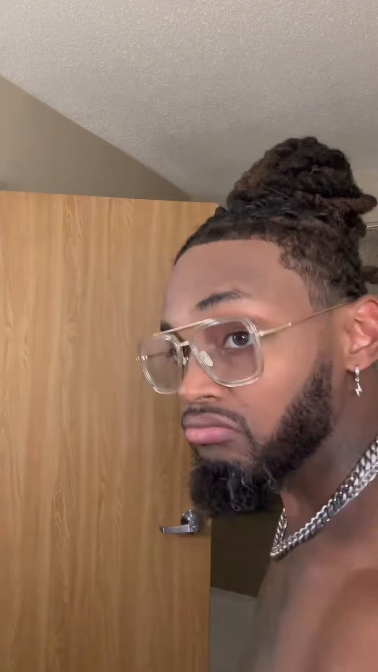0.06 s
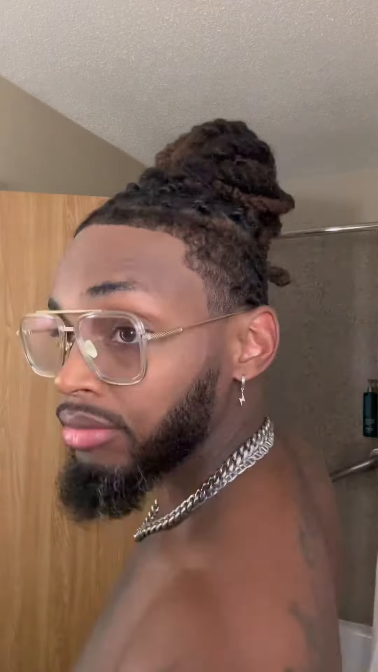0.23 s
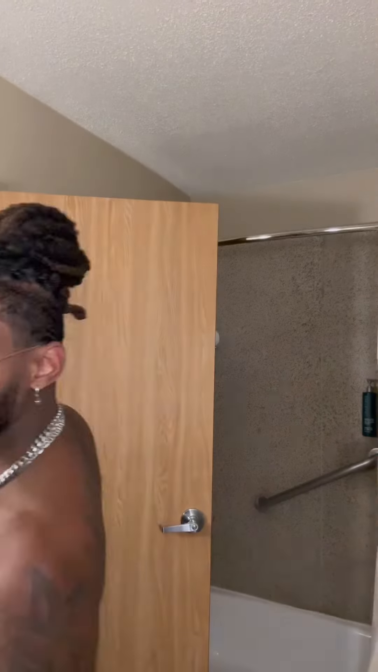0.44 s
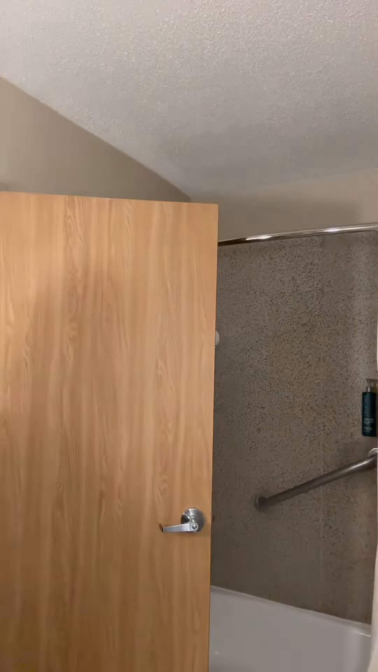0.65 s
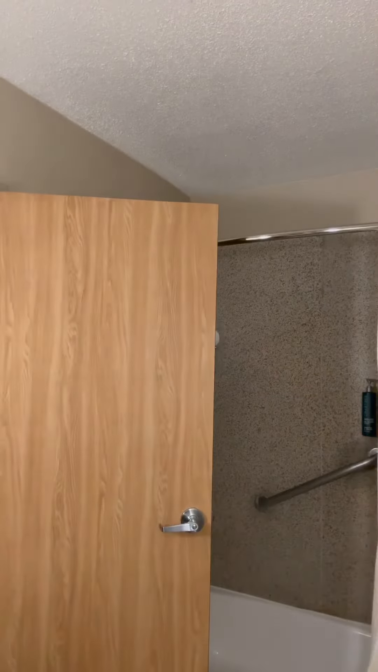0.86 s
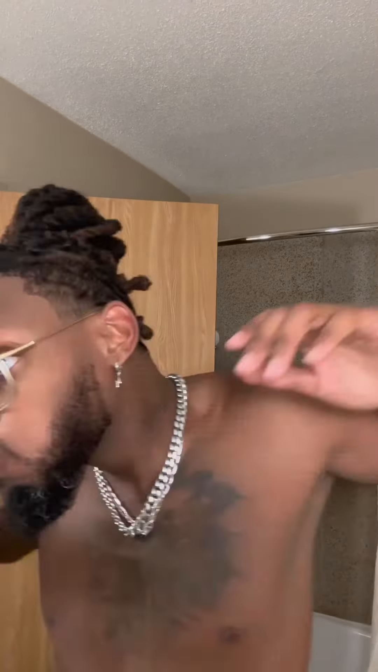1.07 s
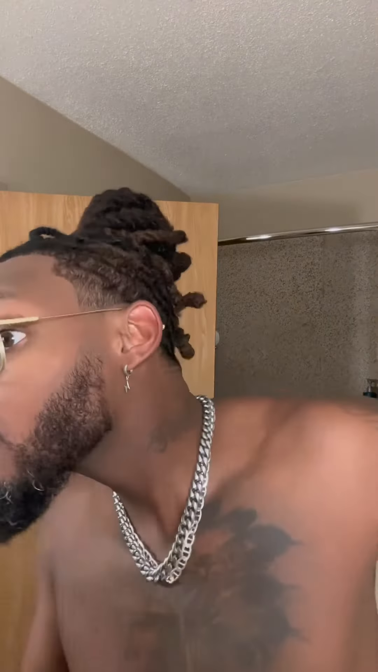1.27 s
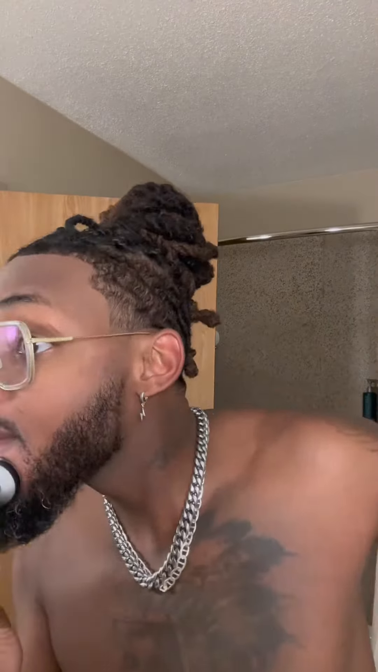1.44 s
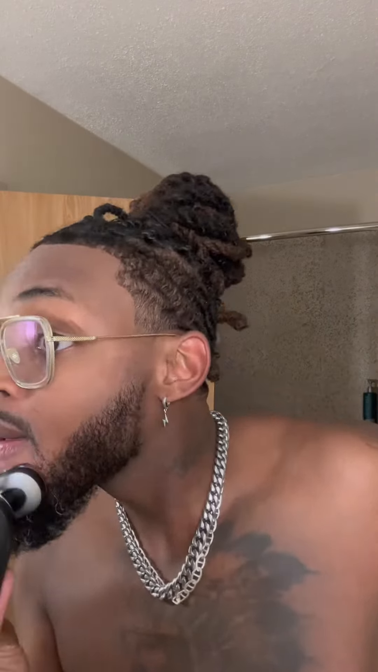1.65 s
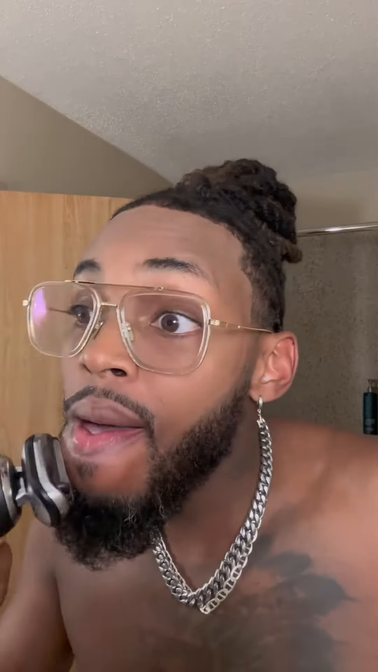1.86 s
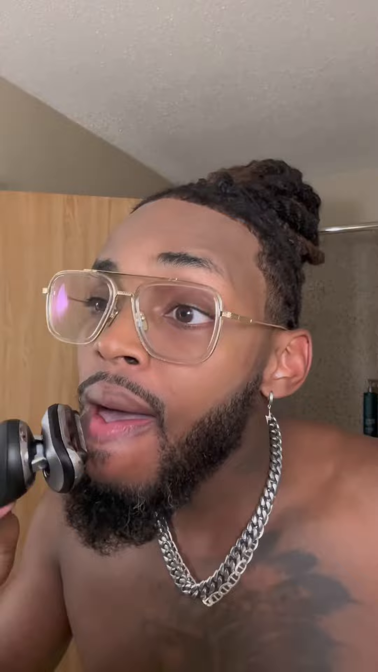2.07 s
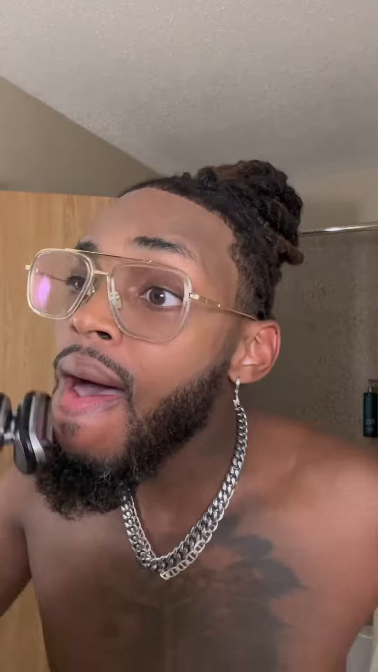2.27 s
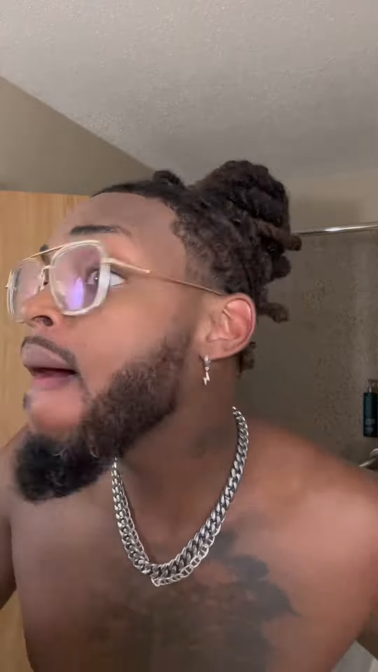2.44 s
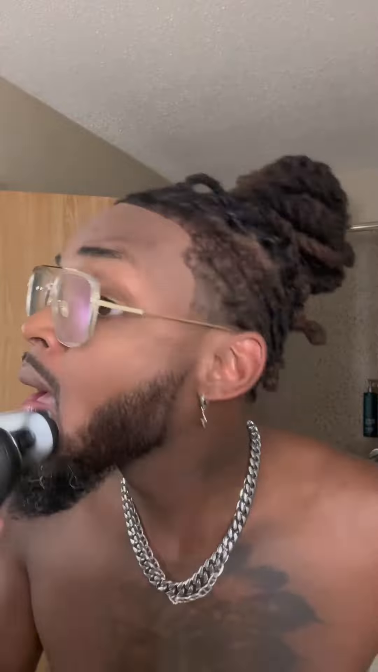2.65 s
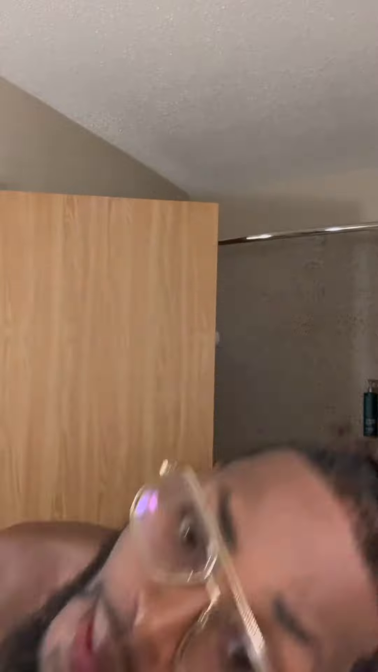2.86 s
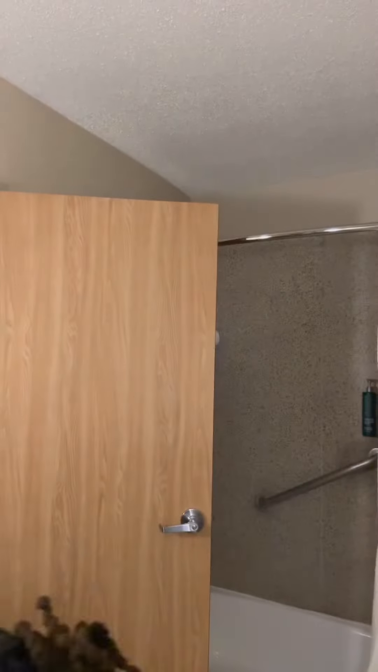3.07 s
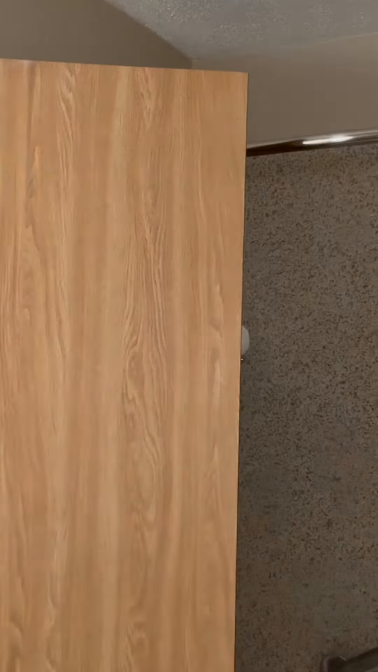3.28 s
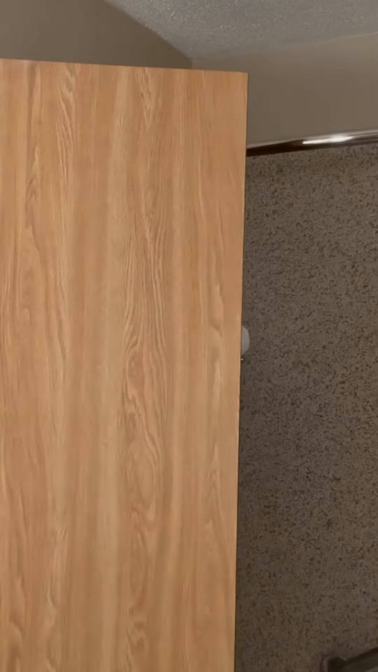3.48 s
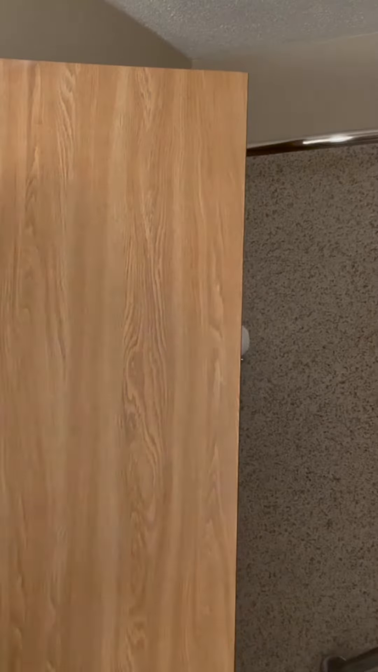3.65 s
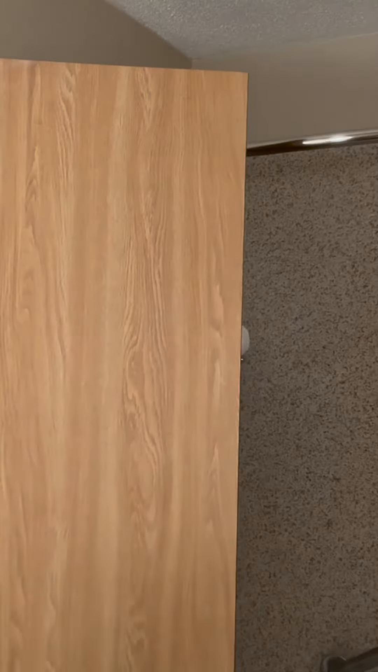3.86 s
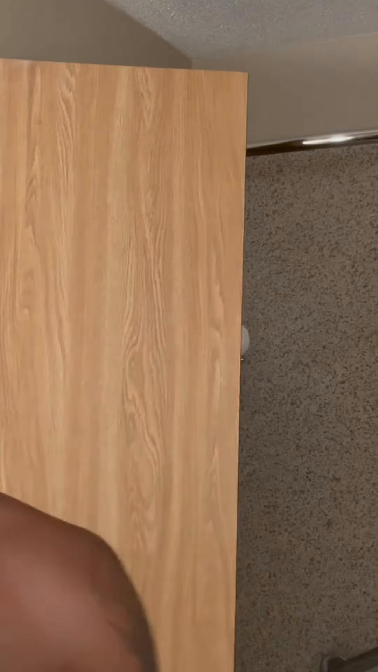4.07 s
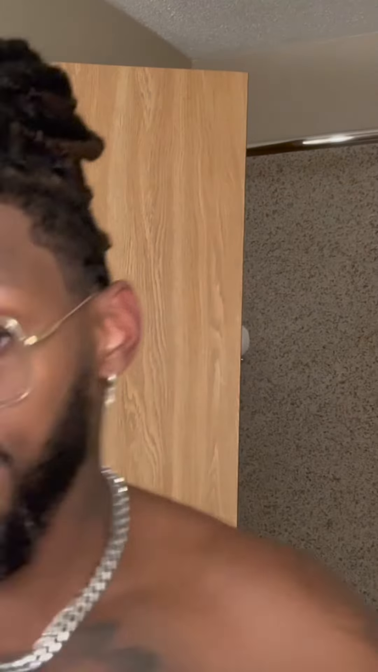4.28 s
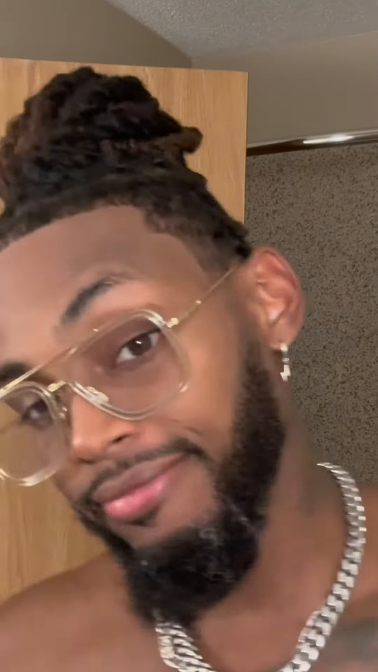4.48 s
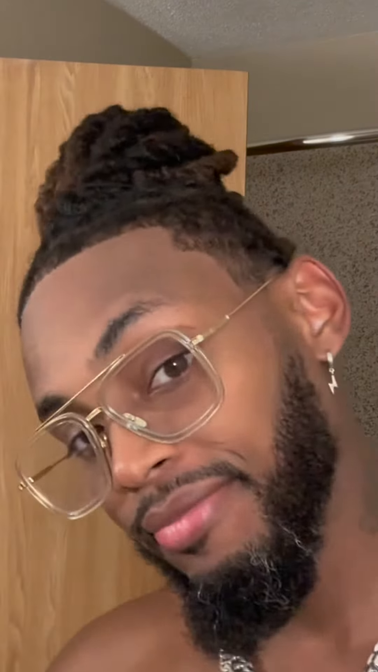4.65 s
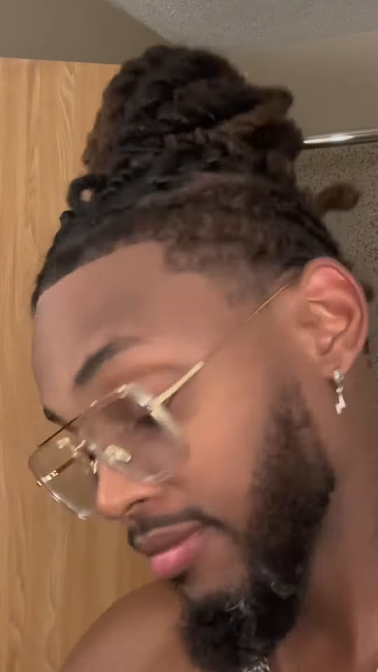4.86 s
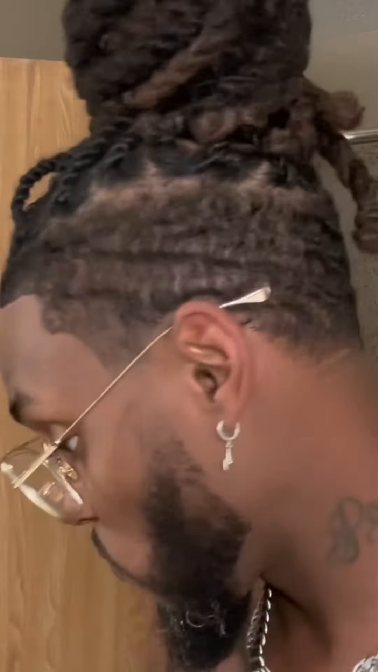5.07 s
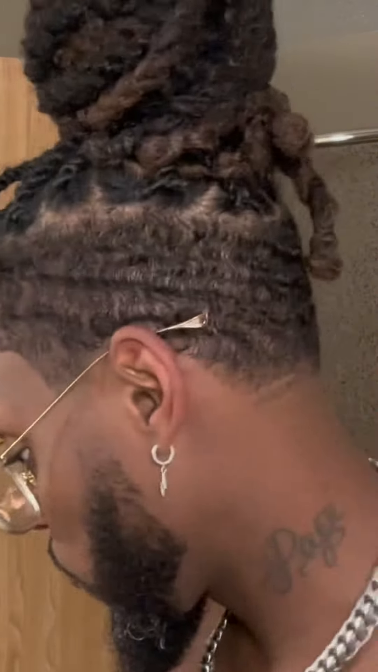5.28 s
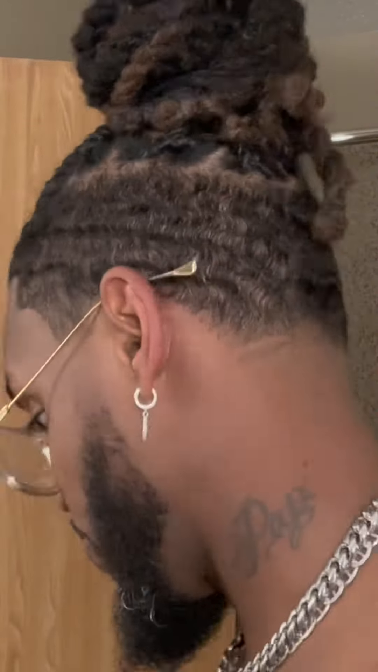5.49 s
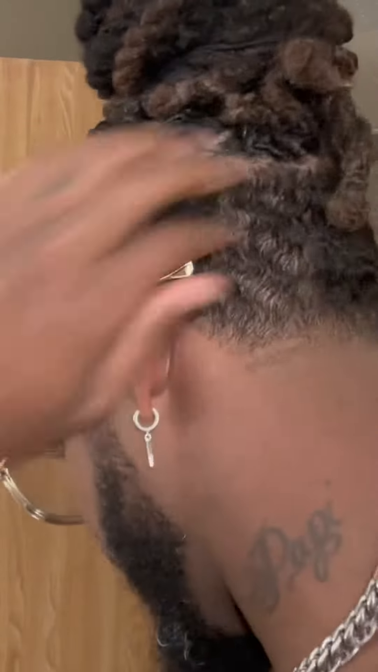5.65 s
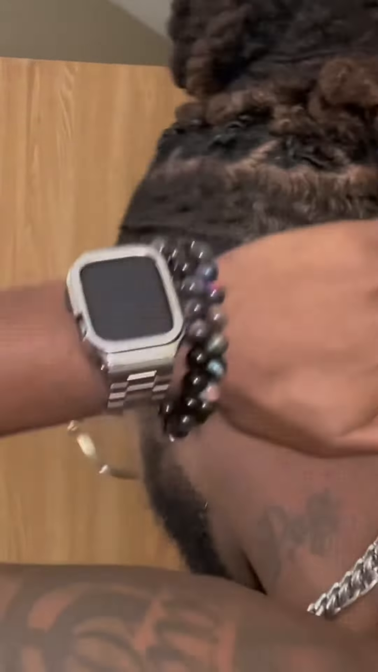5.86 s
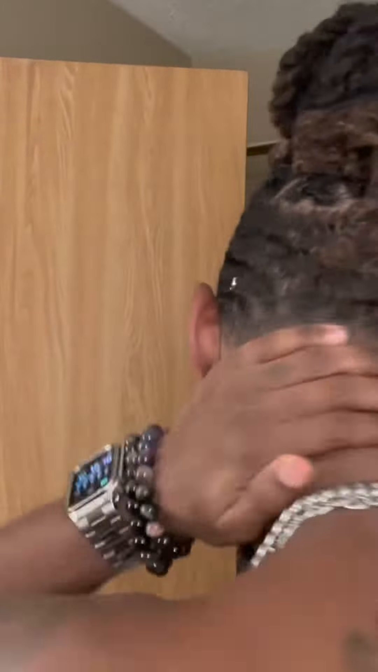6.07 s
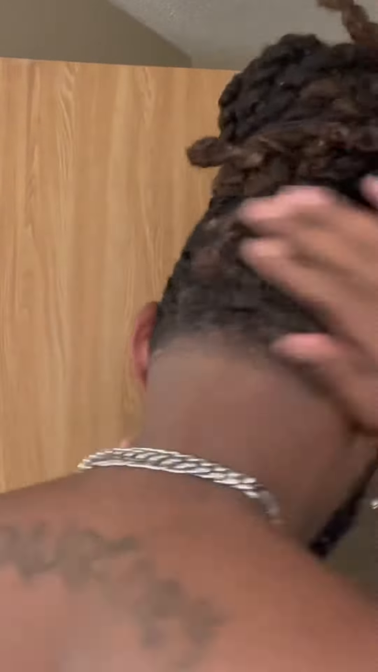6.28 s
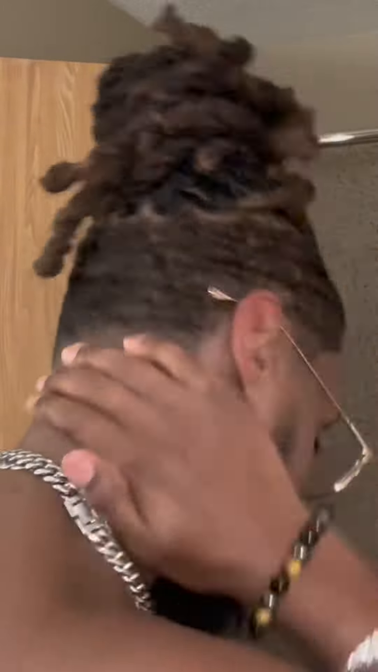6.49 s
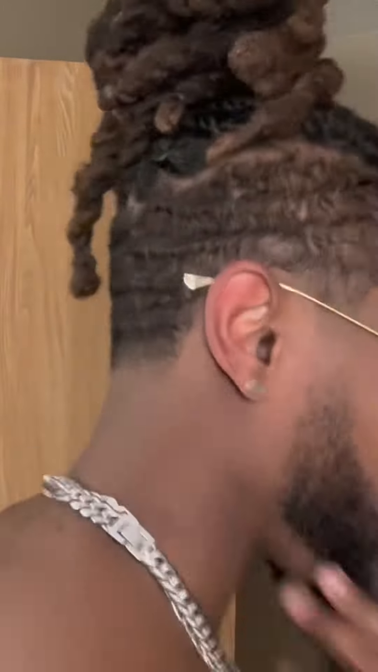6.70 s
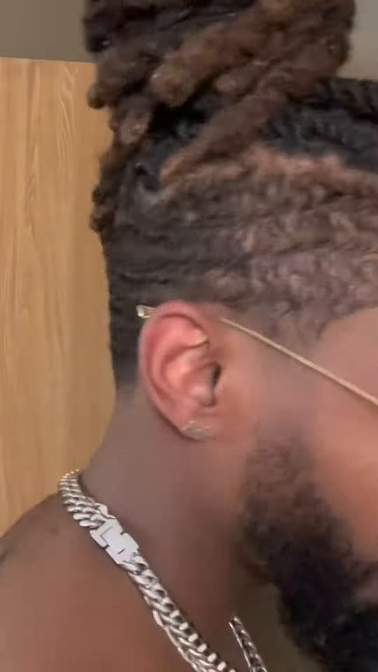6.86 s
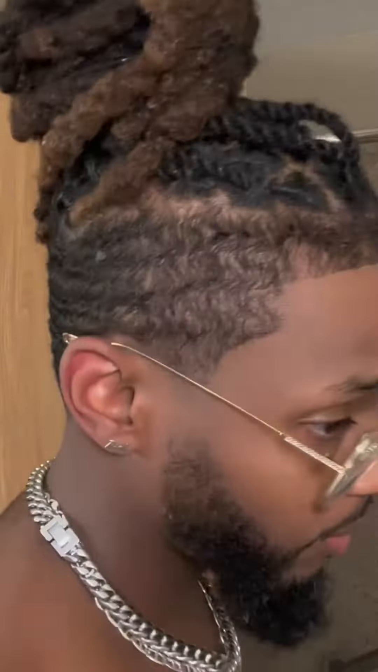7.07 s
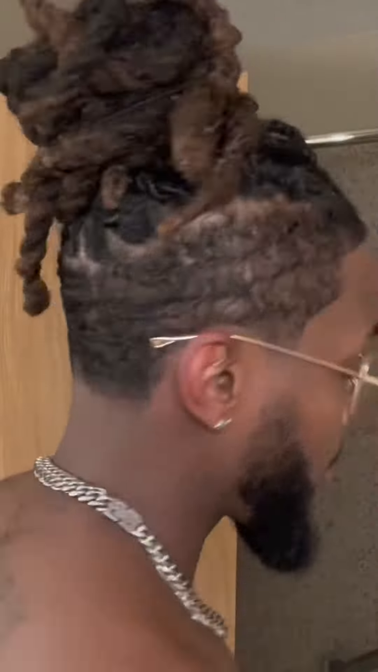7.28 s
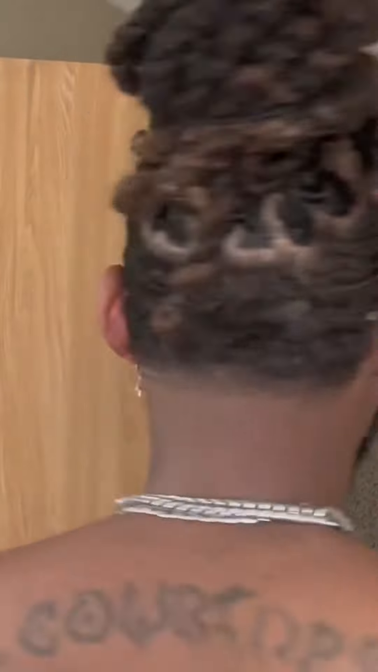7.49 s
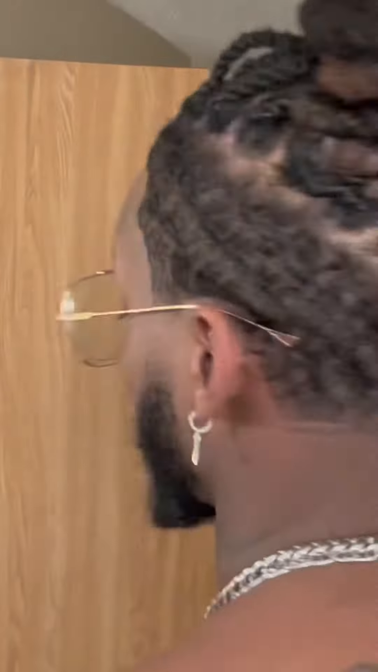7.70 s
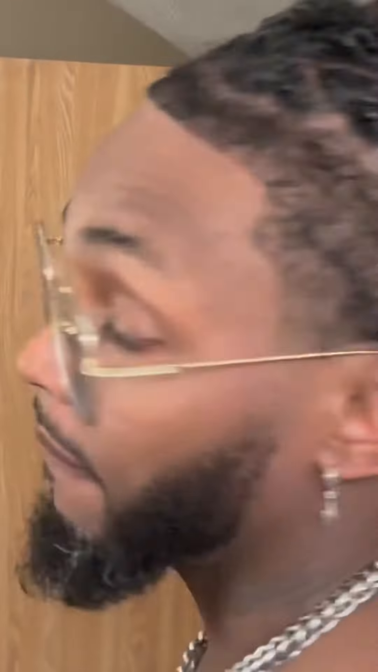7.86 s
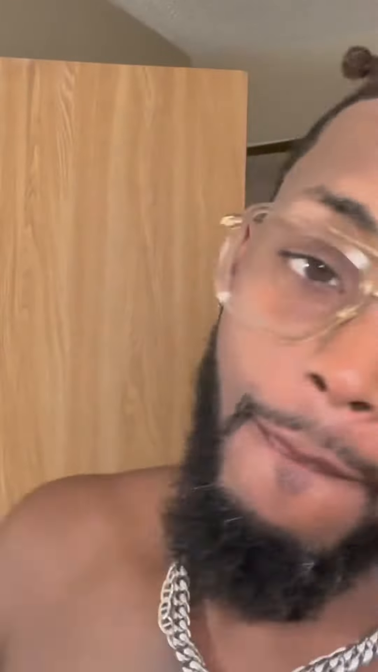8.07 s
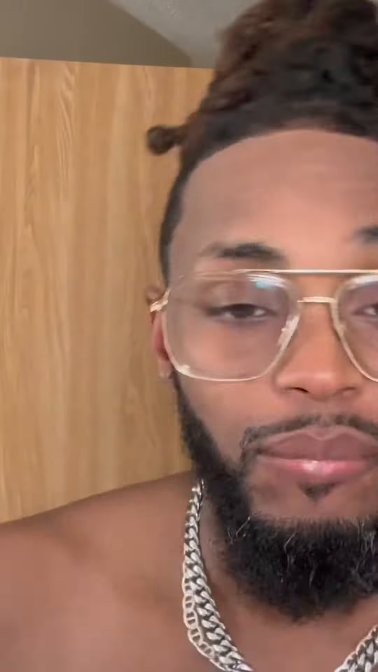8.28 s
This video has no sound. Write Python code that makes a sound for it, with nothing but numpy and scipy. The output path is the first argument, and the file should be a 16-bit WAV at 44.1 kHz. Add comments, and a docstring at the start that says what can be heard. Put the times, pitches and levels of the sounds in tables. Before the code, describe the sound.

A small bathroom, heard closely in stereo, with a soft low ventilation rumble throughout. From 0 to 0.85 s its hum throbs quickly, with small dull ticks and faint rubs; it then steadies, and a brushing rustle rises around 1 s. At 1.13 s an electric hair trimmer spins up rapidly and dominates: a raspy buzz near 148 Hz with strong upper overtones, fine blade hiss and patchy hair crunch, its tone shifting as grip and load change, with a bright swell near 2.8 s. It stops sharply at 3.3 s. The low hum stays, with barely audible thin tones from 3.7 to 5.25 s. Short, dry rubs of skin and hair come irregularly, stronger around 5.3, 6 and 6.7 s, among crisp jewellery clicks at 3.5, 3.8, 5.5 and 5.75 s, the sharpest at 6.77 s. After 7.2 s only light rubs and hum remain.

```python
"""A small bathroom: a ventilation fan, a rustling mover and two seconds of electric trimmer.
First the fan's hum throbs over its rumble, built from sines and coloured noise, with soft rubs and ticks.
From 1.13 to 3.3 s the trimmer runs close by: harmonics of its shaft speed, blade hiss and hair crunch.
Then skin and hair rustle in grainy noise strokes, and jewellery ticks as short rings and knocks, to the end.
The fan stays underneath throughout, joined by faint tones from 3.7 to 5.25 s."""
import sys
import numpy as np
from scipy import signal
from scipy.fft import rfft, irfft, next_fast_len
from scipy.io import wavfile
from scipy.ndimage import uniform_filter1d, map_coordinates

SR = 44100
rng = np.random.default_rng(int(sys.argv[2]) if len(sys.argv) > 2 else 0)


def materialize(psi):
    """Save the field psi as 16-bit PCM at rate SR to the path in sys.argv[1].

    A 1-D psi becomes a single channel; in a 2-D psi each row is a channel.
    """
    bounded = np.clip(np.atleast_2d(psi).T, -1, 1)
    quanta = np.round(bounded * 32767).astype(np.int16)
    wavfile.write(sys.argv[1], SR, quanta)


N = 367339
T = np.arange(N) / SR  # time, s

# three stretches of the fan sound, each with its own hum pitch: start_s, pitch_hz, hum_level_db, throb_depth
# (0-1), draught_level_db
FAN_STAGES = [(0, 114.3, -54, 0.8, -81), (0.851, 128, -51.5, 0, -76), (3.269, 120.3, -45.5, 0.13, -78.5)]
# faint tones that come and go: pitch_hz, level_db; then the span in which they sound: start_s, end_s
FAINT_TONES = [(1050, -85.5), (1990, -88.5), (4720, -99)]
FAINT_TONES_SPAN = (3.7, 5.25)
# colour of the fan's air and motor rumble: freq_hz, density_db (relative, per Hz)
RUMBLE_COLOUR = [(25, -15.5), (45, -7), (66, 6.5), (90, -5.5), (125, -5.5), (160, -14), (200, -7),
                 (260, -21), (320, -17), (450, -40), (700, -41.5), (1200, -45.5), (2000, -51.5),
                 (4000, -54.5), (8000, -64), (15000, -78)]
# loudness curve of that rumble: time_s, level_db
RUMBLE_CURVE = [(0, -56), (.6, -55), (1.2, -52.5), (3.3, -51.5), (5, -52), (8.33, -52.5)]
# colour of the draught through the grille: freq_hz, density_db (relative, per Hz)
DRAUGHT_COLOUR = [(250, -19), (400, 3), (650, 0.5), (760, -22.5), (2000, -42.5)]
THROB_HZ, THROB_DIP_S = 6.45, 0.15  # rate of the throb, and the time of one of its dips

# colour of rubbing, its dull part: freq_hz, density_db (relative, per Hz)
RUB_DULL = [(700, -9.5), (1200, -7.5), (1750, -2), (2100, 2), (2450, -2.5), (4000, -11), (6000, -18.5),
            (9000, -25.5), (13000, -60)]
# colour of rubbing, its treble: freq_hz, density_db (relative, per Hz)
RUB_BRIGHT = [(2000, -22.5), (3800, -9.5), (6000, 0.5), (10500, -6), (14000, -12.5), (15800, -24)]
# colour of rubbing, its low body: freq_hz, density_db (relative, per Hz)
RUB_LOW = [(150, -12.5), (300, 12.5), (450, 4.5), (650, 5), (1000, -33)]
# strokes of skin and hair: start_s, hold_s, level_db, treble_db and body_db (both relative to level_db)
RUB_STROKES = [(0.138, .02, -79, -30, -11), (0.142, 0.078, -69, -30, -7), (0.408, 0.052, -71, -11.5, -11),
               (.56, 0.00019, -70, -16, -20), (0.651, 0, -72, -33, 0), (0.684, .13, -74.5, -29, 12),
               (0.757, 0.021, -68, -18, -4), (0.872, 0.047, -75.5, -16, -8), (0.923, 0.59, -72.5, -6, -24),
               (0.982, 0.13, -59.5, -3.5, -10), (1.155, 0.13, -55, -4, -39), (3.295, 0.054, -66, -21, 0.5),
               (3.408, 0, -64, -4.5, -4), (3.505, 0.018, -76, 9, -9), (3.644, 0.14, -67, -18, -2),
               (3.796, 0.0035, -60.5, -12, -9.5), (3.866, 0, -78, -26, -10), (3.977, 0.03, -56.5, -20, 0),
               (4.075, 0.016, -57, -11, -18), (4.303, 0.022, -67.5, -43, -1),
               (4.391, 0.0085, -56.5, -14.5, -21), (4.53, 0, -75.5, -12, 5), (4.565, 0.015, -68, -34, 1.5),
               (4.2, 0.0095, -83, -28, 10), (4.808, 0.016, -79, -33, 3), (5.059, 0.035, -61, -20.5, -17),
               (5.135, 0.016, -69, -12, -8), (5.259, 0.028, -57, -21, -7),
               (5.265, 0.021, -46.5, -16, -20.5), (5.442, 0.02, -51.5, -19, -6),
               (5.556, 0.11, -70.5, -14, -3), (5.761, .03, -70, 8.5, -5), (5.82, 0.0063, -58.5, -4, -10),
               (5.873, 0.028, -74, 3, -6), (5.96, 0.028, -49.5, -8.5, -36), (6.057, 0.68, -70.5, -4, -8),
               (6.02, 0, -61, -3.5, -20), (6.17, 0.0038, -57.5, -27, -3.5), (6.38, 0.2, -75, 2.5, -8),
               (6.661, 0.014, -80, 11, -8), (6.708, 0, -46.5, -20.5, -11.5), (6.78, 0.017, -80, 5, -4),
               (6.824, 0.042, -75.5, -3, -2.5), (7.099, 0.0093, -83, -1, -1), (7.163, 0.024, -53, -18, -19),
               (7.333, 0.095, -68, -21, -3), (7.476, 0.085, -67.5, -14, -16), (7.55, 0, -57.5, -14, -19),
               (7.741, 0.008, -63, -18, -7), (7.808, 0.012, -55.5, -17.5, -17),
               (7.921, 0.13, -76, -7, -12.5), (8, 0.07, -68, -23, -14), (8.1, 0.16, -73, -20, -6),
               (8.183, 0.18, -73, -11, -6.5)]
STROKE_RISE_DB_PER_S, STROKE_FALL_DB_PER_S = 516, 301.5

# ticks of chain links, beads and fingers: start_s, level_db, knock_db, tail_db (both relative to level_db)
TICK_EVENTS = [(.0303, -73, 10.5, -9), (0.0733, -64.5, 11.5, -26), (.123, -71.5, 16, -12.5),
               (.171, -60.5, 18, -19), (0.1911, -65, 15.5, -30), (0.219, -67, 11, -27),
               (0.2667, -70, 11.5, -15), (.339, -76, 9, -13), (0.3764, -71, 9.5, -15), (.426, -70, 13, -25),
               (.533, -67.5, 11, -33), (.6769, -58.5, 9.5, -17.5), (.727, -69, 11, -24),
               (.826, -54, 10, -25), (3.39, -49.5, -16, -32), (3.4874, -41, -47, -9),
               (3.6342, -66, 16.5, -29), (3.7937, -44, -24, -11), (3.9647, -59.5, 18, -13.5),
               (4.5176, -67, 14.5, -19), (4.6263, -55.5, -10.5, -10), (4.8254, -65.5, -10, -8.5),
               (5.023, -73, 14, -11), (5.1167, -58.5, -7, -11), (5.2192, -64, 14, -24),
               (5.4217, -55.5, 18.5, -14.5), (5.4777, -42, -34, -7), (5.6036, -52.5, -6, -6.5),
               (5.7513, -38, -44, -5.5), (5.7681, -44, -27, -20), (5.868, -48, -25, -14),
               (5.9271, -47.5, -23, -6), (5.9589, -52, 11, 1), (6.026, -59, -6, -16),
               (6.7016, -55, 13, -22), (6.7712, -29, -37, -15.5), (7.1375, -61, -8, -8),
               (7.148, -64, 12, -6)]
# nominal ringing modes of a chain link: pitch_hz, level_db (relative), t60_s
LINK_MODES = [(4900, -19, .006), (6160, -28, 0.0087), (8730, 45, 0.014), (11600, 1, .006),
              (13400, -31, 0.0025)]
TAIL_T60_S = 0.14

# trimmer: time_s, shaft_hz, hair_load (0-1), housing_db (high orders' reference, load 0.4), blade_hiss_db
TRIMMER_CURVES = [(1.13, 152.5, 0.3, -35.5, -56), (1.219, 155.7, .95, -42.5, -49),
                  (1.26, 147.5, 0.08, -39, -50), (1.41, 148.3, 0, -40, -50),
                  (1.47, 148.1, 0.29, -38.5, -52), (1.622, 146.4, 0.33, -40.5, -52),
                  (1.69, 145.4, 0.59, -38, -49.5), (1.79, 148.1, 0, -40, -50),
                  (1.881, 148.3, 0.03, -38.5, -47.5), (1.989, 145.9, 0.31, -39.5, -49),
                  (2.071, 145.7, 0.26, -38.5, -45.5), (2.17, 146.5, 0.35, -39.5, -45.5),
                  (2.3, 146.5, 0.43, -39.5, -49), (2.54, 149.4, 0.2, -39, -49.5),
                  (2.63, 146.3, 0.42, -39.5, -51.5), (2.74, 146.5, 0.7, -39.5, -51.5),
                  (2.79, 148.9, 0.08, -40, -47), (3.028, 147.4, 0, -40, -49),
                  (3.11, 148, 0.62, -44.5, -54.5), (3.3, 146.8, 0.07, -42, -52)]
# trimmer body heard through the tops of its orders: freq_hz, gain_db (relative)
HOUSING_COLOUR = [(82, -61), (140, -21), (308, -32.5), (566, -25.5), (1010, -16), (1390, -24.5),
                  (1580, -12.5), (1830, -4.5), (1980, -7.5), (2110, 3), (2330, -9.5), (2960, -19),
                  (6500, -20), (8450, -38), (14300, -120)]
# steady hiss of the blades in their guards: freq_hz, density_db (relative, per Hz)
BLADE_HISS_COLOUR = [(3000, -13.5), (5000, -5.5), (7500, 8.5), (11500, -2.5), (14500, -3.5), (15800, -14)]
# crunch of cut hair: freq_hz, density_db (relative, per Hz)
CRUNCH_COLOUR = [(300, -45.5), (800, -18.5), (1300, -8.5), (1700, -6), (2050, 3), (2800, -10),
                 (5000, -12.5), (8000, -11.5), (12000, -40.5)]
# orders (multiples of the shaft speed) that swell on their own: order_number
STRONG = [6, 7, 8, 11, 12, 14, 15, 16]
# level at which each strong order rests: level_db
STRONG_REST = [-60, -56.5, -60.5, -53, -54, -43.5, -51.5, -58.5]
# swells as the grip changes, one list for each strong order: start_s, hold_s, level_db
STRONG_SWELLS = [
    [(1.28, 0.1, -47.5), (1.8, 0.14, -53), (2.04, 0.17, -50.5), (2.71, 0.018, -47.5)],
    [(1.26, .11, -40.5), (1.55, 0.017, -48.5), (1.8, 0.15, -48), (2.07, 0.19, -46), (2.56, 0.04, -47),
     (2.8, 0.11, -48)],
    [(1.33, 0.14, -47.5), (1.64, 0.039, -47.5), (2.04, 0.17, -47.5), (2.39, 0.031, -45.5),
     (2.59, 0.076, -49), (2.73, 0.11, -46), (3.24, .04, -56)],
    [(1.66, 0.088, -43.5), (1.78, .18, -38.5), (2.27, 0.03, -35.5), (2.46, 0.093, -41),
     (2.68, 0.0047, -35.5), (2.81, 0, -33.5), (3.01, 0.008, -43.5)],
    [(1.27, 0.14, -46.5), (1.76, 0.078, -37.5), (2.47, 0.031, -41.5), (2.8, 0.056, -36.5),
     (2.97, 0.064, -40.5), (3.16, .11, -42)],
    [(1.26, .24, -36), (1.75, 0.053, -35), (2.0, 0.03, -40.5), (2.38, 0.17, -34.5), (2.69, .03, -38),
     (2.83, 0.084, -24.5), (3.1, 0.087, -36), (3.23, 0.055, -39)],
    [(1.22, .02, -38), (1.29, 0.2, -40), (1.68, 0.023, -40), (2.4, 0.045, -43.5), (2.9, 0.11, -45.5),
     (3.22, 0.055, -37.5)],
    [(1.34, 0.2, -42), (1.84, 0.073, -37), (2.39, .08, -45.5), (2.82, 0.036, -40)],
]
SWELL_DB_PER_S = 154.5  # rise and fall
DEEP_DB, LOW_ORDERS_DB = -56.5, -5.5  # lowest orders before load; other low ones relative to the housing
CLEAR_DB_PER_LOAD = -4.5  # the weaker orders sink as hair loads the blades
SETTLE_S = 0.13  # the low orders come up while the motor settles
SPIN_UP_S, SPIN_UP_DB, SWITCH_OFF_S, SWITCH_OFF_DB = 0.057, -26, 0.018, -18

# stereo width, gain of the side signal: freq_hz, gain_db
SIDE_WIDTH = [(60, -40.5), (120, -44), (200, -14), (370, -10), (700, -6.5), (1300, -0.5), (2300, -6.5),
              (4300, -2.5), (6500, -38), (9000, -52), (15000, -45.5)]
# phase between left and right, which thins the centre near 8 kHz and the side near 11 kHz:
# freq_hz, phase_half_turns (left minus right)
STEREO_PHASE = [(0, 0), (4300, 0), (7050, -1), (8800, -1), (10350, -2), (13000, -2), (14300, -3),
                (22050, -3)]
TOP_HZ = 15850  # upper edge of the sound


def undb(db):
    """Decibels to gain."""
    return 10 ** (np.asarray(db) / 20)


def shape(points, hz):
    """Gain of a colour table, straight in dB on a log-frequency axis."""
    f, db = np.transpose(points)
    return undb(np.interp(np.log(np.maximum(hz, 1)), np.log(f), db))


def colour(x, points):
    """Filter by a colour table."""
    size = next_fast_len(x.shape[-1])
    gain = shape(points, np.arange(size // 2 + 1) * SR / size)
    return irfft(rfft(x, size) * gain, size)[..., :x.shape[-1]]


def band(x, lo_hz, hi_hz):
    """Rms level of a band."""
    sos = signal.butter(4, [lo_hz, hi_hz], "bandpass", fs=SR, output="sos")
    return np.std(signal.sosfilt(sos, x))


def walk(rate_hz, length, spread_db=None):
    """Random wander about zero, in straight lines; or, given spread_db, a gain that wanders about 1."""
    points = rng.standard_normal(int(length * rate_hz / SR) + 2)
    if spread_db is not None:
        points = undb(spread_db * points)
    return np.interp(np.arange(length) * rate_hz / SR, np.arange(len(points)), points)


def hiss(points, length=N):
    """Coloured noise as centre and side."""
    centre, side = colour(rng.standard_normal((2, length)), points)
    return np.array([centre, colour(side, SIDE_WIDTH)])


def patchy(x, spread_db, span_s, span_hz):
    """Colour that shifts by chance: gain patches about span_s long and span_hz wide."""
    hz, s, z = signal.stft(x, SR, nperseg=512)
    field = rng.standard_normal((int(hz[-1] / span_hz) + 2, int(s[-1] / span_s) + 2))
    where = np.meshgrid(hz / span_hz, s / span_s, indexing="ij")
    gain = map_coordinates(field, where, order=1)
    return signal.istft(z * undb(spread_db * gain), SR, nperseg=512)[1][..., :x.shape[-1]]


def grains(points, scatter_db, lo_hz, hi_hz):
    """Dense tiny slips of uneven size through a colour; centre has rms 1 in the given band."""
    slips = rng.standard_normal((2, N)) * undb(scatter_db * rng.exponential(size=N))
    centre, side = patchy(colour(slips, points), spread_db=5.0, span_s=0.016, span_hz=275.4)
    return np.array([centre, colour(side, SIDE_WIDTH)]) / band(centre, lo_hz, hi_hz)


def swell(t, s, hold, db, rise_db_per_s, fall_db_per_s):
    """Gain that rises to db at s, holds, and falls, at steady rates in dB."""
    before = np.maximum(s - t, 0)
    after = np.maximum(t - s - max(hold, 0), 0)
    return undb(db - rise_db_per_s * before - fall_db_per_s * after)


def fan():
    """Motor hum as one sine, throbbing at first, plus faint tones, over noise for rumble and draught."""
    s, *columns = np.transpose(FAN_STAGES)
    stage = np.maximum(np.searchsorted(s, T, "right") - 1, 0)
    # glide from stage to stage over 50 ms
    hz, hum_db, depth, draught_db = (uniform_filter1d(c[stage], size=SR // 20) for c in columns)
    throb = 1 - np.clip(depth, 0, 1) * np.cos(2 * np.pi * THROB_HZ * (T - THROB_DIP_S))
    hum_gain = np.sqrt(2) * undb(hum_db) * throb * walk(4.5, N, spread_db=0.4)
    hum = hum_gain * np.sin(2 * np.pi * np.cumsum(hz) / SR)

    start_s, end_s = FAINT_TONES_SPAN
    heard = (T > start_s) & (T < end_s)
    for tone_hz, tone_db in FAINT_TONES:
        tone = undb(tone_db) * walk(5.0, N, spread_db=5.0) * np.sin(2 * np.pi * tone_hz * T)
        hum += tone * heard

    rumble = hiss(RUMBLE_COLOUR)
    rumble *= undb(np.interp(T, *np.transpose(RUMBLE_CURVE))) / rumble[0].std()
    draught = hiss(DRAUGHT_COLOUR)
    draught *= undb(draught_db) / draught[0].std()
    return rumble + draught + hum * np.array([[1], [0]])  # hum in the centre only


def rustle():
    """Skin and hair rub in grainy slips, stroke by stroke, each with its own share of treble and body."""
    dull = grains(RUB_DULL, 1.67, 670, 7900)
    treble = grains(RUB_BRIGHT, 1.4, 9800, 16000)
    body = grains(RUB_LOW, 2.5, 200, 800)
    power = np.zeros((3, N))  # overlapping strokes add in power
    for s, hold, db, treble_db, body_db in RUB_STROKES:
        near = slice(max(int((s - 0.2) * SR), 0), int((s + hold + 0.3) * SR))
        gain = swell(T[near], s, hold, db, STROKE_RISE_DB_PER_S, STROKE_FALL_DB_PER_S)
        power[:, near] += np.outer(undb([0, treble_db, body_db]), gain) ** 2
    return sum(np.sqrt(p) * layer for p, layer in zip(power, (dull, treble, body)))


def link_ring(t):
    """Decaying modes of a chain link, detuned by chance each time; peak 1."""
    ring = np.zeros(len(t))
    for hz, db, t60 in LINK_MODES:
        detuned_hz = hz * (1 + 0.04 * rng.standard_normal())
        ring += undb(db) * np.sin(2 * np.pi * detuned_hz * t) * 1000.0 ** (-t / t60)
    return ring / np.abs(ring).max()


def ticks():
    """A crack, a short ring of the link, a dull knock, and tails of both from the tiles."""
    t = np.arange(8192) / SR
    out = np.zeros((2, N + len(t)))
    crack = np.cos(2 * np.pi * 11000 * t + 0.9) * np.exp(-t / 0.00007)
    for s, db, knock_db, tail_db in TICK_EVENTS:
        knock = undb(knock_db) * np.sin(2 * np.pi * 1700 * t) * np.exp(-t / 0.00013)
        knock += undb(knock_db - 14) * np.sin(2 * np.pi * 420 * t) * np.exp(-t / 0.0004)  # its thud
        bright, dull = hiss(RUB_BRIGHT, len(t)), hiss(RUB_DULL, len(t))
        tail = bright / bright[0].std() + undb(knock_db) * dull / dull[0].std()
        tail *= undb(tail_db) * 1000.0 ** (-t / TAIL_T60_S)
        hard = undb(-1.2 * max(knock_db - 10.5, 0))  # a soft, dull touch hardly cracks
        hit = hard * (1.12 * link_ring(t) + 4.0 * crack) + 3.35 * knock
        i = int(s * SR)
        out[:, i:i + len(t)] += undb(db) * (tail + hit * np.array([[1], [0.3]]))
    return out[:, :N]


def shaft_orders(t, turn, load, housing_db):
    """Multiples of the shaft speed: strong ones swell alone as the hand moves, weaker ones follow the load."""
    length = len(t)
    strong, deep, low, high = np.zeros((4, 2, length))
    settle = np.minimum((t - t[0]) / SETTLE_S, 1) ** 2
    for order in range(1, 48):
        order_hz = order * 148  # nominal, for the colour tables
        # biting hair breaks up the higher orders
        shake = 0.004 * order ** 2 * (load + 0.04) * walk(30 + 1.1 * order, length)
        centre, side = np.sin(order * turn + shake + rng.uniform(0, 2 * np.pi, (2, 1)))
        side *= walk(9.04, length, spread_db=5.0) * shape(SIDE_WIDTH, order_hz)
        if order <= 12:
            centre = centre * settle
        if order in STRONG:
            k = STRONG.index(order)
            gains = [undb(STRONG_REST[k]) * walk(17, length, spread_db=5.5)]
            gains += [swell(t, *row, SWELL_DB_PER_S, SWELL_DB_PER_S) for row in STRONG_SWELLS[k]]
            gain = np.max(gains, axis=0)
            side = undb(-6.5) * walk(5.05, length) * side
            strong += np.sqrt(2) * gain * np.array([centre, side])
            continue
        flutter = walk(6 + 0.4045 * order, length, spread_db=min(4.7 + 0.32 * order, 5.2))
        pair = shape(HOUSING_COLOUR, order_hz) * np.array([centre * flutter, side])
        if order < STRONG[0] - 1:
            deep += pair
        elif order < STRONG[-1]:
            low += pair
        else:
            high += pair
    # a weak line between the first two orders
    between = walk(6.0, length, spread_db=1.5) * np.sin(3 * turn / 2)
    deep[0] += 0.5 * deep[0].std() * between
    deep *= undb(DEEP_DB) * (0.5 + 1.6 * load) / deep[0].std()  # the lowest orders grow with the load
    weak = undb(LOW_ORDERS_DB) * low / low[0].std() + undb(0.06) * high / high[0].std()
    return strong + deep + undb(housing_db + CLEAR_DB_PER_LOAD * (load - 0.4)) * weak


def blade_hiss(turn, level_db):
    """Steady noise of blades sliding in their guards, scraping once a turn."""
    grit = hiss(BLADE_HISS_COLOUR, len(turn)) * (1 + 0.13 * np.sin(turn))
    return grit * undb(level_db) / band(grit[0], 9000, 14000)


def hair_crunch(load, housing_db):
    """Patchy noise of hair being cut, louder as the load grows."""
    crunch = patchy(hiss(CRUNCH_COLOUR, len(load)), spread_db=4.5, span_s=0.018, span_hz=250.0)
    return crunch * (0.31 + load) * undb(housing_db + 6.5) / crunch[0].std()


def trimmer():
    """A spinning shaft drives the blades; hair load shakes its speed and adds crunch."""
    s, *columns = np.transpose(TRIMMER_CURVES)
    start, length = int(s[0] * SR), int((s[-1] - s[0]) * SR)
    t = T[start:start + length]
    hz, load, housing_db, hiss_db = (np.interp(t, s, c) for c in columns)
    load = np.clip(load, 0, 1)
    shaken_hz = hz * (1 + 0.01156 * load * walk(70, length))
    turn = 2 * np.pi * np.cumsum(shaken_hz) / SR  # shaft angle, radians
    sound = shaft_orders(t, turn, load, housing_db)
    sound += blade_hiss(turn, hiss_db) + hair_crunch(load, housing_db)
    run_s = s[-1] - s[0] - SPIN_UP_S - SWITCH_OFF_S
    rise, fall = -SPIN_UP_DB / SPIN_UP_S, -SWITCH_OFF_DB / SWITCH_OFF_S
    switch = swell(t, s[0] + SPIN_UP_S, run_s, 0, rise, fall)
    out = np.zeros((2, N))
    out[:, start:start + length] = sound * switch * signal.windows.tukey(length, 0.012)
    return out


def scene():
    """All sources, from centre and side to left and right."""
    centre, side = fan() + rustle() + ticks() + trimmer()
    return np.array([centre + side, centre - side])


def record(dry):
    """Left and right drift apart in phase up the treble; a steep low-pass cuts the top."""
    size = next_fast_len(N)
    phase = np.pi * np.interp(np.arange(size // 2 + 1) * SR / size, *np.transpose(STEREO_PHASE))
    rotation = np.exp(0.5j * np.outer([1, -1], phase))  # half the phase to each side
    stereo = irfft(rfft(dry, size) * rotation, size)[:, :N]
    return signal.sosfilt(signal.ellip(8, 0.2, 70, TOP_HZ, fs=SR, output="sos"), stereo)


dry = scene()
out = record(dry)
materialize(out)
```